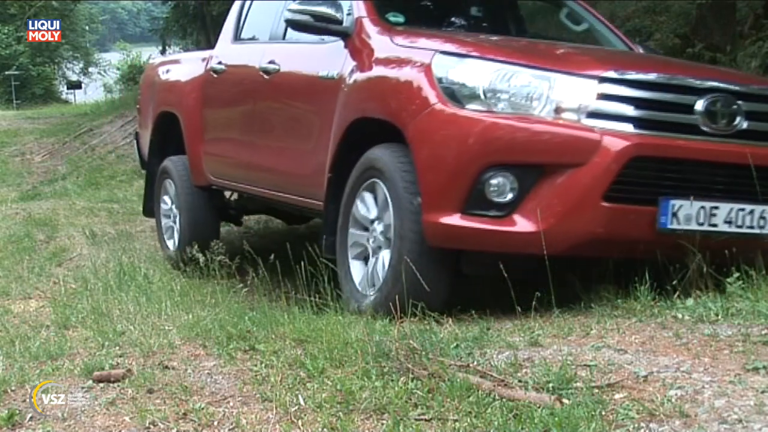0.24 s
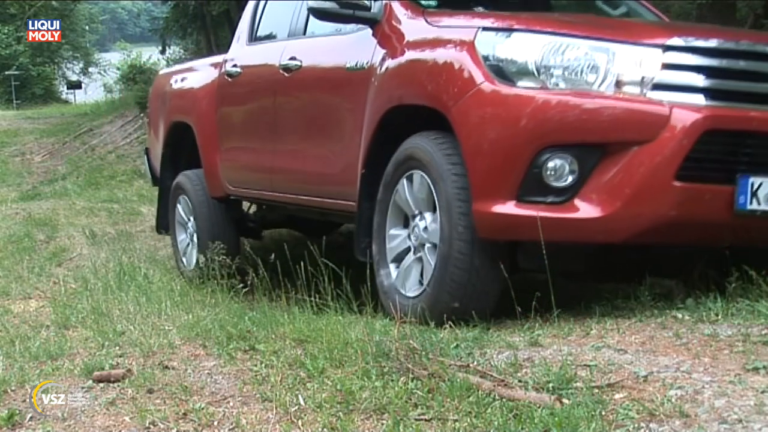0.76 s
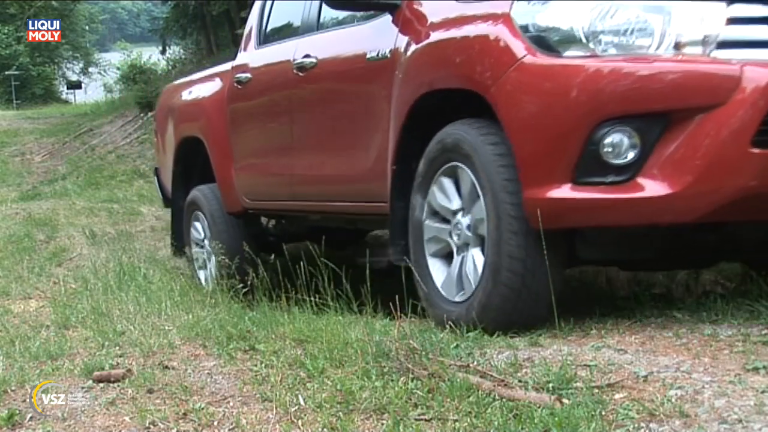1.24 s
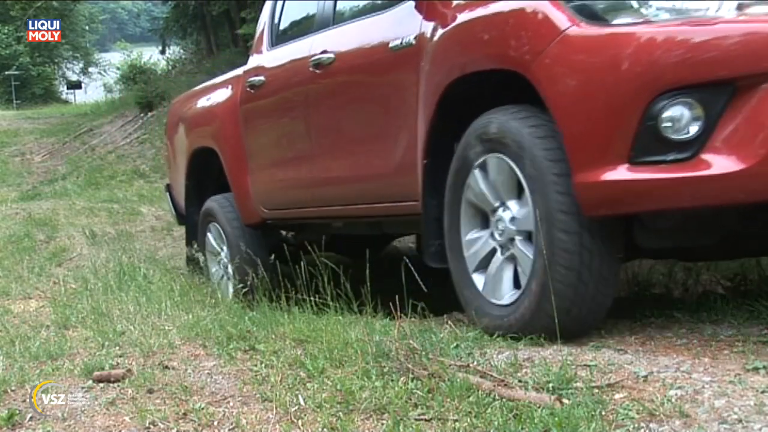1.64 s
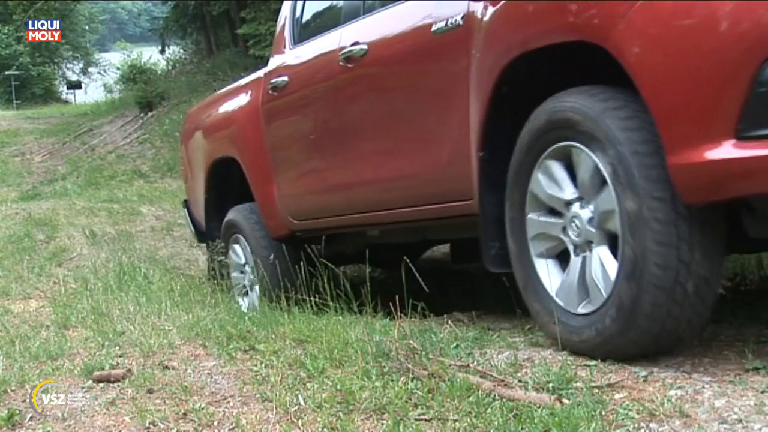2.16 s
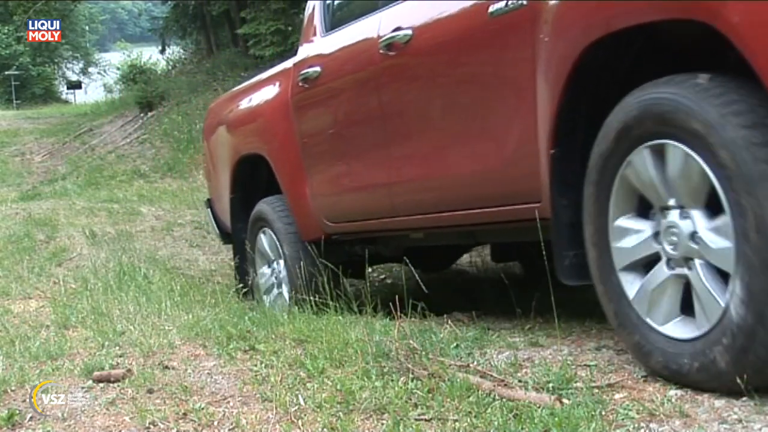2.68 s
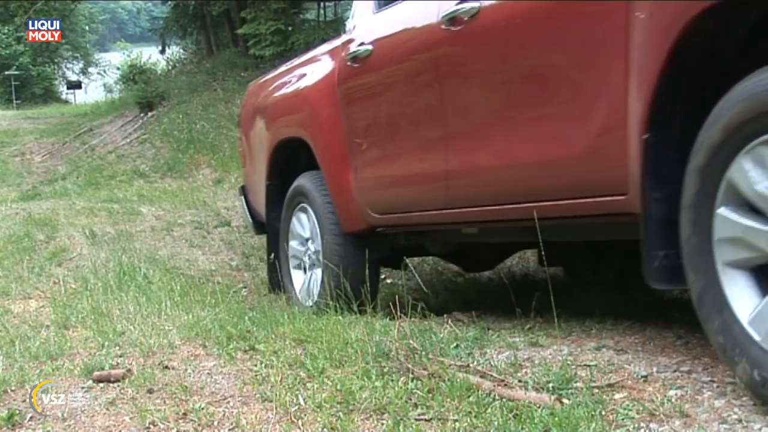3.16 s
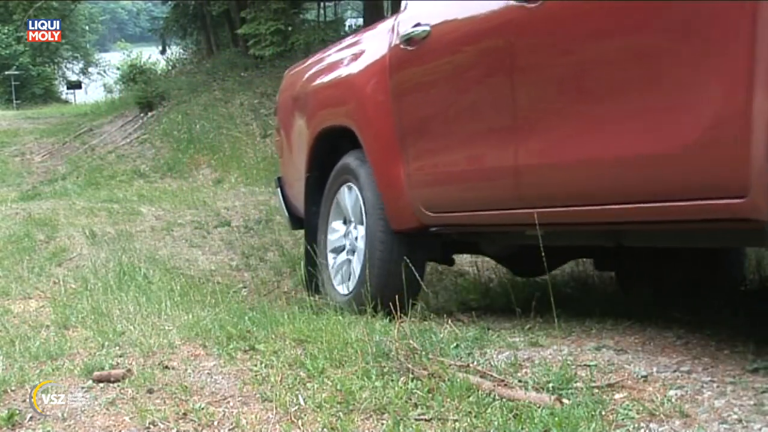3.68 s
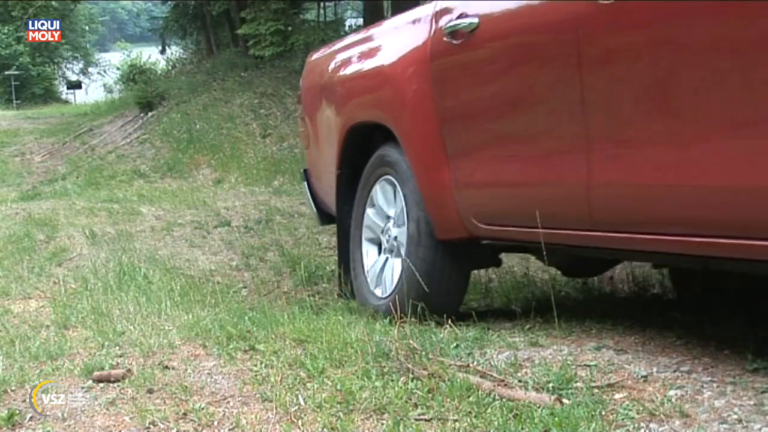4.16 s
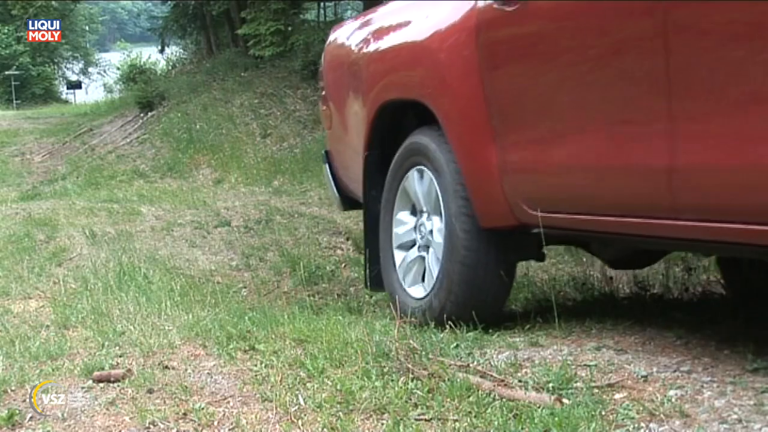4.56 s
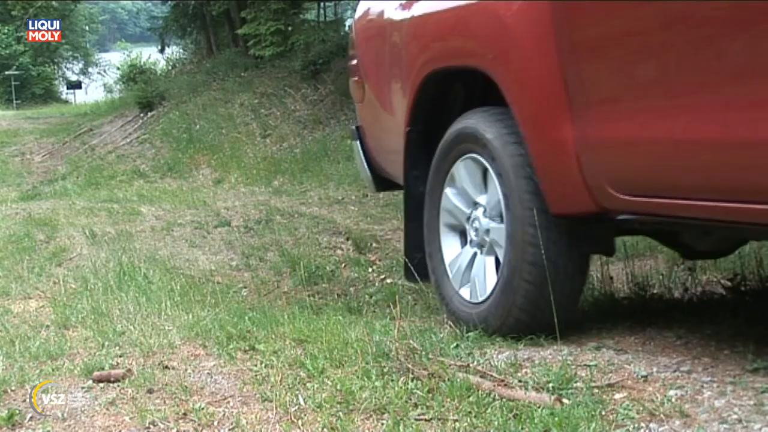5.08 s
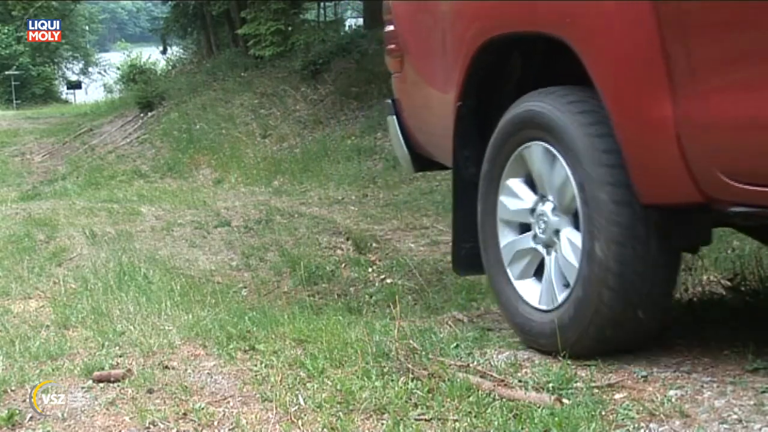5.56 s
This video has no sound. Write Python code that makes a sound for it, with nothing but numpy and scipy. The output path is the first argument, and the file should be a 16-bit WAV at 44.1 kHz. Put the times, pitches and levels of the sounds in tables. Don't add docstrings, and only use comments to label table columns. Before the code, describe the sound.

A diesel pickup idles along slowly over grass, its clattering engine coming closer, growing louder and brighter and drifting to the right.

```python
import sys
import numpy as np
from scipy import signal
from scipy.fft import next_fast_len
from scipy.io import wavfile
from scipy.ndimage import uniform_filter1d

SR = 44100
rng = np.random.default_rng(int(sys.argv[2]) if len(sys.argv) > 2 else 0)


def log_audio(samples):
    frames = np.atleast_2d(samples).T
    limited = np.clip(frames, -1, 1)
    pcm = np.round(limited * 32767).astype(np.int16)
    wavfile.write(sys.argv[1], SR, pcm)


def convert_level_to_amplitude(level_db):
    exponent = np.asarray(level_db, float) / 20
    return 10 ** exponent


N = 257103

# (time [s], firing rate [1/s])
FIRING = [(0.0, 33.97), (0.45, 34.75), (0.7, 34.09), (0.9, 32.12), (1.03, 31.24), (1.22, 33.52),
          (1.44, 34.41), (1.72, 33.52), (2.25, 33.9), (2.56, 33.11), (2.95, 33.91), (3.26, 33.4),
          (3.65, 33.83), (4.12, 33.62), (4.73, 33.32), (4.84, 32.21), (5.11, 33.87), (5.83, 33.99)]


def evened(x):
    return x / np.sqrt(np.mean(x ** 2) + 1e-20)


def along(table):
    s, *columns = np.transpose(table)
    return [np.interp(np.arange(N) / SR, s, c) for c in columns]


def across(table, hz):
    f, *columns = np.transpose(table)
    return np.array([np.interp(np.log(hz + 1), np.log(f + 1), c) for c in columns])


def spectra(x):
    return signal.stft(x, SR, nperseg=1024, noverlap=768)


def patches(shape, bins, frames):
    smooth = uniform_filter1d(rng.standard_normal(shape), bins, axis=0)
    return evened(uniform_filter1d(smooth, frames))


def hump(at_s, rise_s, fall_s):
    since = np.arange(N) / SR - at_s
    return np.exp(-(since / np.where(since < 0, rise_s, fall_s)) ** 2)


def turned(at_s, width_s):
    return .5 + .5 * np.tanh((np.arange(N) / SR - at_s) / width_s)


def facing():
    return hump(4.8, 0.26, 0.26)


def snaps(low_hz=7000, high_hz=13000, fade_s=.0006):
    # (time [s], peak [dB], left-right [dB])
    cracks = [
        (0.641, -36, 3),
        (0.6636, -40, 4),
        (1.4554, -52, -1.5),
        (2.1291, -47, -2.0),
        (4.54, -41, -6.0),
        (4.6568, -47, -16),
    ]
    out, t = np.zeros((2, N + 400)), np.arange(400) / SR
    bright = signal.butter(3, [low_hz, high_hz], "band", fs=SR, output="sos")
    for s, db, pan_db in cracks:
        burst = rng.standard_normal((2, len(t))) * np.exp(-t / fade_s)
        crack = signal.sosfilt(bright, burst)
        port_db = db + np.array([[.5], [-.5]]) * pan_db
        at = round(s * SR)
        out[:, at:at + len(t)] += convert_level_to_amplitude(port_db) * crack / abs(crack).max()
    return out[:, :N]


def knocks(turns, at=.36, rise=0.11, fall=0.4, spread_db=0.8, alike=0.75,
           tick_at=0.24, tick_fall=0.068, tick_size=1.24):
    cylinder_db = [-0.097, -0.075, -1.5, 0.75]
    tick_by_cylinder = [.3, 1, .35, .9]
    since = turns - at
    count = np.floor(since).astype(int) + 4
    cylinder = count % 4
    u = since % 1
    strength_db = np.take(cylinder_db, cylinder) + spread_db * rng.standard_normal(256)[count]
    shape = convert_level_to_amplitude(strength_db) * (1 - np.exp(-u / rise)) * np.exp(-u / fall)

    tick = (u > tick_at) * np.exp(-abs(u - tick_at) / tick_fall) * np.take(tick_by_cylinder, cylinder)
    tick_strength = 0.27 * turned(1.13, 0.63) + 0.71 * facing()
    tick = tick_size * tick * tick_strength * rng.uniform(0.52, 1, 256)[count]

    habits, place = rng.standard_normal((5, 1310)), (u * 1310).astype(int)
    habit = np.sqrt(alike) * habits[4, place] + np.sqrt(1 - alike) * habits[cylinder, place]
    return evened((shape + tick) * rng.standard_normal(N)), evened(shape * habit)


def hollow(turns, steady=0.69):
    # (loudest time [s], rise [s], fall [s], pitch [Hz], rms [dB])
    hollows = [
        (.9, 0.065, 0.36, 350, -52),
        (3.5, 0.49, 0.51, 556, -51.5),
        (4.25, 0.27, .3, 566, -51.5),
        (4.92, 0.45, 0.44, 484, -46),
    ]
    looseness = [0, 1, 1, .3]
    new, habit = knocks(turns)
    drive, out = steady * habit + (1 - steady) * new, np.zeros(N)

    def ringing(turn, edge_hz):
        smoother = signal.butter(2, edge_hz, fs=SR, output="sos")
        return evened((turn * signal.sosfilt(smoother, drive / turn)).real)

    for (at_s, rise_s, fall_s, hz, db), wide in zip(hollows, looseness):
        turn = np.exp(2j * np.pi * hz * np.arange(N) / SR)
        narrow, loose = ringing(turn, 15), ringing(turn, 100)
        ring = np.sqrt(1 - wide) * narrow + np.sqrt(wide) * loose
        out += convert_level_to_amplitude(db) * hump(at_s, rise_s, fall_s) * ring
    return out


def rattle(turns, hz):
    # (frequency [Hz], fresh knock share [0-1], repeated knock share [0-1], lag [ms])
    knock_share = [(121, 0.17, 0.05, 1), (297, 0.23, 0.05, 1), (517, 0.17, 0.25, 1), (1212, 0.32, 0.18, -1),
                   (2792, 0.28, 0.05, 1.5), (5130, 0.43, 0.04, 5.5), (8010, 0.22, 0.02, 3.5),
                   (11720, 0.26, 0, -1)]
    fresh, repeated, lag_ms = across(knock_share, hz)[..., None]
    fresh, repeated = np.clip([fresh, repeated], 0, .5)
    lag = np.exp(-2j * np.pi * np.cumsum(lag_ms / 1000, axis=0) * hz[1])
    new, habit = knocks(turns)
    knock = np.sqrt(fresh) * spectra(new)[2] + np.sqrt(repeated) * spectra(habit)[2]
    rush = spectra(rng.standard_normal(N))[2]
    return lag * knock + np.sqrt(1 - fresh - repeated) * rush


def port_colour(place, hz):
    # (frequency [Hz], sum [dB], difference
    # [dB], likeness in step [-1..1], likeness a quarter turn off [-2..1])
    colour_ahead = [(114, -3.5, -16.5, -0.3, -0.7), (193, -8, -36, -0.57, -0.8),
                    (264, -11, -27, -0.56, -0.7), (350, -10, -23, -0.5, -0.65),
                    (490, -13, -25, -0.9, -0.59), (665, -14.5, -21, -0.65, -0.26),
                    (820, -18, -33, -0.7, -0.0), (1010, -9.5, -19, -0.7, -0.1),
                    (1200, -11.5, -31, -0.5, -0.3), (1360, -17.5, -21.5, -0.53, 0.0),
                    (1950, -13, -29, -0.64, 0.4), (2470, -9.5, -52, -0.1, 0.0), (2920, -9, -37, 0.0, -0.0),
                    (3600, -17, -32, 0.7, -0.1),
                    (4060, -21.5, -26, 0.6, -0.2), (4490, -32.5, -29, -0, -0.6),
                  (5000, -21.5, -31, -0.6, -0.2), (5280, -29, -26, 0.1, 0.7), (5800, -30.5, -22, 0.7, 0.3),
                  (6200, -40, -25, 0.3, -0.1), (7300, -48, -37, 0.0, -0.3), (8250, -44.5, -36, -0.3, 0.2),
                  (9200, -46.5, -35, -0.3, 0.1), (10830, -30, -37, -0.8, 0.2), (11600, -36, -38, -0, -0.2),
                  (12600, -34, -33, -0.0, -0.2), (14100, -36.5, -37, -0.3, 0.2),
                  (15500, -31, -33, -0.3, 0.2)]
    colour_near = [(119, -3, -23, -0.37, -0.92), (193, -3, -49, -0.44, -1.6), (260, -9.5, -20, -0.1, -0.9),
                   (350, -6.5, -23, -0.3, -0.36), (487, -6, -11, -0.35, -0.73),
                   (650, -3, -10.5, -0.59, -0.36), (767, -12, -15, -0.8, -0.4),
                   (1080, -5.5, -11, -0.61, -0.3), (1220, -6.5, -10.5, -0.86, -0.5),
                   (1380, -9, -8.5, -0.75, -0.0), (1900, -9, -17.5, -0.7, 0.3),
                   (2430, -4.5, -18.5, -0.57, -0.0), (2980, -4.5, -28, -0.0, -0.2),
                   (3505, -16, -21, 0.72, -0.3),
                   (4150, -24, -21, 0.2, -0.5), (4570, -27, -23, -0.3, -0.7), (5010, -22, -24, -0.3, -0.3),
                 (5280, -31, -28, -0.2, 0.4), (5520, -31.5, -21, -0.2, 0.1), (5650, -31, -14.5, -0.2, 0.2),
                 (6800, -40.5, -30, -0.3, 0.3), (8150, -41.5, -33, -0.3, 0.3), (9330, -38, -37, -0.1, 0.2),
                 (10700, -28, -39, -0.6, 0.0), (11700, -31, -28, -0.7, -0.2), (12600, -30, -32, -0.6, 0.1),
                 (14000, -26.5, -43, -0.3, -0.1), (15400, -33, -23, -0.4, -0.0)]
    colour_abreast = [(119, -3, -30, -0.1, -0.97), (193, -2.5, -35, -0.22, -1.8),
                      (280, -5.5, -21, 0.11, -0.9), (350, -5.5, -14, 0.18, -0.67),
                      (490, 2, 3, -0.34, -0.81), (621, -1, 0, -0.64, -0.34), (737, -9, -8, -0.53, -0.6),
                      (1060, -3, -2.5, -0.98, -0.3), (1250, -3, -1, -1, -0.41),
                      (1570, -2.5, -0.5, -0.8, -0.17), (1870, -6, -9, -0.77, 0.1),
                      (2310, -6, -8, -0.81, -0.0), (2880, -7.5, -18, -0.47, -0.33),
                      (3580, -15.5, -15.5, -0.36, -0.7),
                      (4120, -19.5, -16, -0.68, -0.5), (4460, -23.5, -19, -0.7, -0.3),
                    (5060, -14.5, -19, -0.4, -0.5), (5240, -32, -17, -0.22, 0.1),
                    (5760, -19.5, -16, -0.89, 0.1), (6160, -28.5, -22, -0.68, 0.1),
                    (7100, -40, -37, -0.0, 0.3), (8200, -40, -32, -0.5, -0.2), (9300, -37, -31, -0.2, 0.5),
                    (10800, -20.5, -27, -0.94, 0.1), (11700, -21, -26, -0.71, -0.0),
                    (12600, -20.5, -22, -0.8, -0.1), (14000, -19, -21, -0.86, -0.0),
                    (15500, -25, -22, -0.6, -0.3)]
    ahead = across(colour_ahead, hz)[..., None]
    near = across(colour_near, hz)[..., None]
    abreast = across(colour_abreast, hz)[..., None]
    return near + np.minimum(place - 1, 0) * (near - ahead) + np.maximum(place - 1, 0) * (abreast - near)


def engine_bay(turns, flicker_db=0.88, drift_db=1.0, base_db=-25):
    # (time [s], place [0 ahead, 1 near, 2 abreast])
    path = [
        (0, -0.31),
        (.5, -0.15),
        (1.6, 0.53),
        (2.6, 0.65),
        (3.2, 1.01),
        (4, 1.3),
        (5.3, 1.94),
        (5.83, 1.87),
    ]
    hz, t, _ = spectra(turns)
    direct, stray = rattle(turns, hz), rattle(turns, hz)
    frame = np.minimum(t * SR, N - 1).astype(int)
    place = along(path)[0][frame]
    shade_db = (0.5 * facing() - 2.5 * turned(5.12, 0.11))[frame]
    shaded = np.clip(hz / 2000, 0, 1) / (1 + (hz / 4000) ** 4)
    load_db = 0.96 + shade_db * shaded[:, None]

    sum_db, difference_db, in_step, off_step = port_colour(place, hz)
    like = 1.21 * (in_step + 1j * off_step)
    like /= np.maximum(abs(like) / .98, 1)
    drift = patches(direct.shape, 4, 90)
    flicker = patches(direct.shape, 30, 4)
    bass_cut_db = 18 * np.clip(1 - hz / 65, 0, 1)[:, None]
    common = convert_level_to_amplitude(base_db + load_db + drift_db * drift + flicker_db * flicker - bass_cut_db)
    mid = common * convert_level_to_amplitude(sum_db) * direct
    side = common * convert_level_to_amplitude(difference_db) * (like * direct + np.sqrt(1 - abs(like) ** 2) * stray)
    ports = np.array([mid + side, mid - side])
    return signal.istft(ports, SR, nperseg=1024, noverlap=768)[1][:, :N]


def third_order_view():
    hidden_db = -13 * np.maximum(np.arange(N) / SR - 4.0, 0)
    return hidden_db + turned(5.12, .03) * (5.5 - hidden_db)


def exhaust(turns, idle_per_s=33.6):
    # (multiple of the firing rate [1], rms at start [dB], middle [dB], end [dB],
    # loss by squared lugging [dB/Hz^2])
    strong_orders = [(1, -39, -35, -31.5, 1.4), (2, -51.5, -43.5, -39.5, 0.8),
                     (3, -50.5, -49.5, -50.5, 0.5), (5, -61, -54, -56.5, 0), (4, -52.5, -51, -59.5, 2)]
    # (multiple of the firing rate [1], rms at start [dB], middle [dB], end [dB])
    weak_orders = [(2.6, -48, -51, -61), (4.5, -74, -61, -60), (5.5, -66, -56, -64), (5.75, -76, -61, -64),
                   (6, -65, -66, -56), (7, -60, -60, -65), (9, -67, -66, -61), (10, -70, -63, -62),
                   (11, -67, -62, -58)]
    # (frequency [Hz], width [Hz], boost [dB])
    panel = (158, 9, 11)
    panel_hz, width_hz, boom_db = panel
    out, late = np.zeros(N), np.arange(N) / N
    rate = along(FIRING)[0]
    lug = np.maximum(idle_per_s - rate, 0) ** 2

    orders = []
    for k, *db, lost_db in strong_orders:
        order_db = np.interp(late, [0, .5, 1], db) - lost_db * lug
        if k == 3:
            order_db = order_db + third_order_view()
        orders.append((k, order_db))
    orders += [(k, np.interp(late, [0, .5, 1], db)) for k, *db in weak_orders]

    for k, db in orders:
        waver = evened(np.interp(late, np.linspace(0, 1, 40), rng.standard_normal(40)))
        lag = k * (k - 1) + .02 * (k - 1) * waver
        boom = boom_db / (1 + (2 * (k * rate - panel_hz) / width_hz) ** 2)
        level_db = db + boom + .14 * (k - 1) * waver
        out += np.sqrt(2) * convert_level_to_amplitude(level_db) * np.cos(2 * np.pi * k * turns - lag)
    return out


def scene():
    turns = -.405 + np.cumsum(along(FIRING)[0]) / SR
    hum = exhaust(turns)
    late = np.linspace(3, 14, N) * np.gradient(hum)
    ring = hollow(turns)
    quarter = np.imag(signal.hilbert(ring, next_fast_len(N))[:N])
    aside = np.linspace(.1, 1.1, N) * (0.97 * quarter - .4 * ring)
    middle = np.array([hum - late + ring + aside, hum + late + ring - aside])
    return middle + engine_bay(turns) + snaps()


def top_cut(x):
    return signal.sosfilt(signal.butter(12, 15710, fs=SR, output="sos"), x)


def record(dry):
    edge = signal.firwin(255, 15750, window=("kaiser", 9), fs=SR)
    mix = signal.oaconvolve(dry, edge[None], "same") - .0008
    return top_cut(mix)


dry = scene()
out = record(dry)
log_audio(out)
```